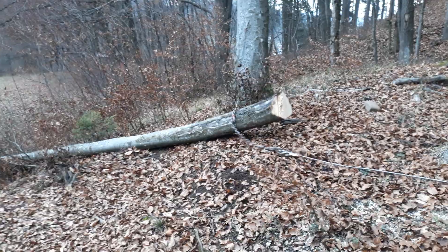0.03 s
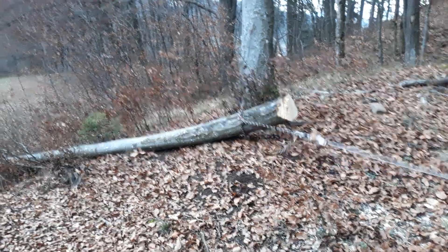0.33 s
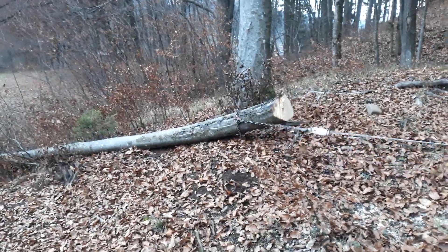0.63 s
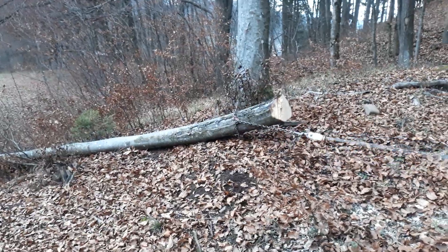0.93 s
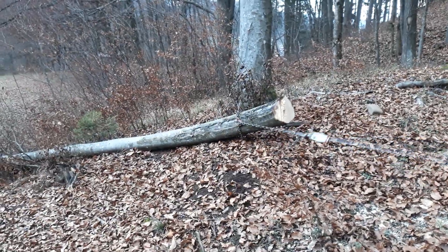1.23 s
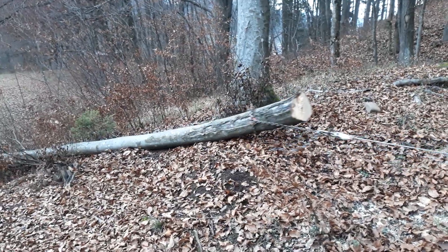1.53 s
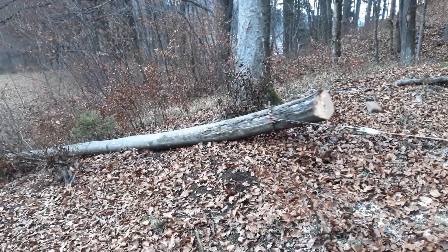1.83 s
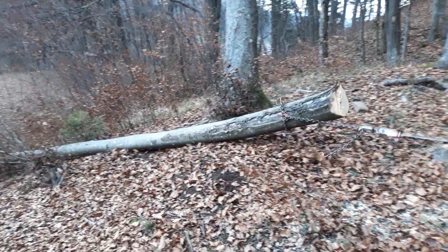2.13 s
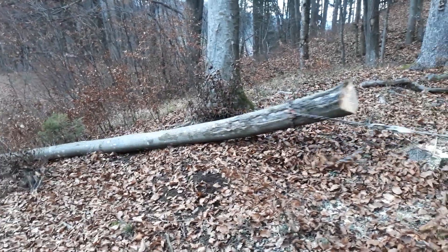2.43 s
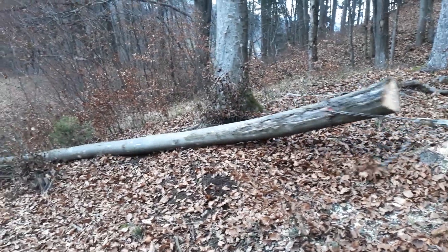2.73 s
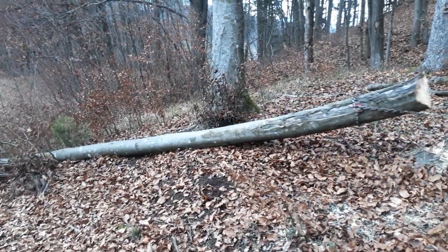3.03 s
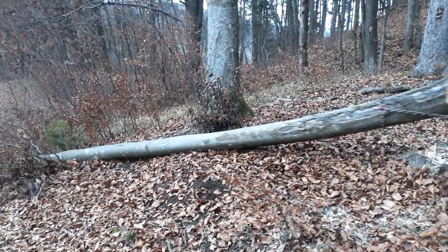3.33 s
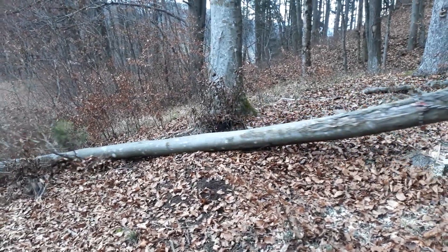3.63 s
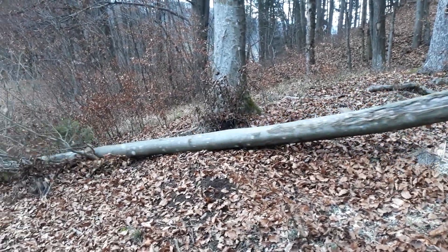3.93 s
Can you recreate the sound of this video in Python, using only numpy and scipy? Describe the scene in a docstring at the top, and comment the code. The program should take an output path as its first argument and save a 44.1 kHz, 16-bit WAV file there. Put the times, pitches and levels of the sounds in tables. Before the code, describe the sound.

Log crunching and scraping over dry leaves, with cracks and a low engine chug.

```python
"""A winch hauls a heavy log through dry leaves. First its engine chugs at a distance.
Then the cable swishes up out of the leaves and tightens, as a chain jingles and stalks crunch.
At about 1.3 s the log groans and breaks loose with a crack; the chain clinks and the engine sags.
The trunk slides on, crushing leaves, scraping its bark and bumping the soil.
Near the end, twigs snap loudly."""
import sys
import numpy as np
from scipy import signal
from scipy.fft import rfft, irfft
from scipy.io import wavfile
from scipy.ndimage import map_coordinates

SR = 44100
rng = np.random.default_rng(int(sys.argv[2]) if len(sys.argv) > 2 else 0)


def persist_wave(psi):
    """Save psi, clipped to +-1, as 16-bit WAV."""
    counts = np.round(np.clip(psi, -1, 1) * 32767).astype(np.int16)
    wavfile.write(sys.argv[1], SR, np.atleast_2d(counts).T)


N = 176400  # 4 seconds


def gain(db):
    """Turn decibels into a number to multiply by."""
    return 10 ** (np.asarray(db) / 20)


def unit(x):
    """Scale a signal to an average strength (rms) of 1."""
    return x / np.sqrt(np.mean(x ** 2) + 1e-18)


def clock():
    """The time of every sample, in seconds."""
    return np.arange(N) / SR


def curve(table, column=1):
    """Join a table's points with straight lines in time, holding the first and last values."""
    rows = np.array(table)
    return np.interp(clock(), rows[:, 0], rows[:, column])


def drift(turns_per_s):
    """A random wander, usually between -1 and 1."""
    points = rng.standard_normal(2048)
    return unit(map_coordinates(points, [clock() * turns_per_s], order=1, mode="wrap"))


def colour(x, points):
    """Make some frequencies stronger than others; beyond the points, lose 48 dB per octave."""
    hz, db = np.array(points).T
    size = 4096
    octave = np.log2(np.maximum(np.arange(size // 2 + 1) * SR / size, 1))
    knots = np.log2(hz)
    outside = np.abs(octave - np.clip(octave, knots[0], knots[-1]))
    shape_db = np.maximum(np.interp(octave, knots, db) - 48 * outside, -80)
    # build the filter so that it rings only after a click, never before
    cepstrum = irfft(np.log(gain(shape_db)))
    cepstrum[1:size // 2] *= 2
    cepstrum[size // 2 + 1:] = 0
    response = irfft(np.exp(rfft(cepstrum)))
    return signal.fftconvolve(x, response / np.linalg.norm(response))[:len(x)]


def ticks(per_s, spread_db):
    """Tiny clicks at random moments; the spread makes their sizes uneven."""
    happens = rng.random(N) < per_s / SR
    sizes = gain(spread_db * np.minimum(rng.standard_normal(N), 3))
    return unit(happens * sizes * rng.choice([-1, 1], N))


def fade(start, fade_s, hold_s=0):
    """Start suddenly, hold, then die away by 60 dB in fade_s seconds."""
    age = clock() - start
    return (age >= 0) * np.exp(-np.log(1000) * np.clip((age - hold_s) / fade_s, 0, 10))


def ringing(blows, tones):
    """A struck object rings: each tone builds up over two cycles and dies away."""
    age = clock()[:SR // 4]
    ring = 0
    for hz, db, fade_s in tones:
        loudness = gain(db) * np.minimum(age * hz / 2, 1) * np.exp(-np.log(1000) * age / fade_s)
        ring += loudness * np.sin(2 * np.pi * hz * age)
    return signal.fftconvolve(blows, ring)[:N]


def breaking(events, crackle, hold_s, fade_s, click_db):
    """Each event is one sharp break and a short, dying run of smaller ones."""
    breaks = crackle * sum(gain(db) * fade(start, fade_s, hold_s) for start, db in events)
    for start, db in events:
        breaks[int(start * SR)] += gain(db + click_db)
    return breaks


# how fast the engine fires (time [s], firing rate [Hz])
ENGINE_SPEED = [(0.08,36.3),(0.97,36.7),(1.23,36.0),(1.49,34.5),(1.85,35.4),(2.07,34.9),(2.31,35.3),(3.08,35.4),(3.39,34.6),(3.54,35.3),(4.0,35.0)]
# exhaust tones at 1, 2, 3... times the firing rate (relative level free [dB], when pulling [dB])
EXHAUST_TONES = [(-20,-21),(-4,1),(-1,1),(-2.5,-2.5),(1,1),(-43,-19),(-12,-11.5),(-16.5,-13.5),(-21,-31)]
# the colour of the engine and winch clatter (frequency [Hz], relative level [dB])
CLATTER_COLOUR = [(130,-12.5),(205,0),(250,-11),(600,-15),(785,-9.5),(880,-18),(1100,-12.5),(1880,-7),(2500,-23),(4300,-21),(5200,-16.5),(8000,-19.5),(10100,-39),(15000,-32)]
LOAD_START_S, LOAD_RISE_DB_PER_S = 1.305, 1.03  # the engine works harder as the log climbs
SILENCER_LAG_RAD = 0.297  # the silencer delays the higher tones, softening each beat

def engine():
    """Low exhaust beats swell as the winch takes the load; clatter throbs with each firing."""
    since_load = clock() - LOAD_START_S
    load = np.clip(since_load / 0.03, 0, 1)
    firing_hz = curve(ENGINE_SPEED) * (1 + 0.0073 * drift(40.3))  # firings come a bit early or late
    angle = 2 * np.pi * (np.cumsum(firing_hz) / SR + 0.286)
    exhaust = 0
    for k, (free_db, pulling_db) in enumerate(EXHAUST_TONES):
        tone = np.cos((k + 1) * angle - SILENCER_LAG_RAD * k ** 2)
        exhaust += gain(free_db + load * (pulling_db - free_db)) * tone
    exhaust_db = -37.5 + load * LOAD_RISE_DB_PER_S * since_load + 1.5 * drift(36)
    throb = 1 + 0.09 * np.cos(angle)
    clatter = colour(rng.standard_normal(N) * throb, CLATTER_COLOUR)
    return gain(exhaust_db) * unit(exhaust) + gain(-41.5) * clatter


# how strongly the cable stirs the leaves (time [s], level [dB])
CABLE_LEVEL = [(0.08,-47),(0.25,-41.5),(0.3,-45),(0.36,-33.5),(0.43,-31.5),(0.485,-39.5),(0.52,-34),(0.6,-38),(0.645,-44),(0.8,-45.5),(0.92,-51.5),(0.99,-42),(1.07,-52.5),(1.26,-45),(1.3,-42)]
# the colour of its swish (frequency [Hz], relative level [dB])
CABLE_COLOUR = [(790,-5.5),(1100,-9.5),(2110,-3),(2850,-6.5),(3130,-0.5),(3400,-1),(4700,-4.5),(5250,0.5),(6000,-6.5),(7800,-5),(10000,-15.5),(15500,-13)]

def cable():
    """The cable moves through leaves: a thick swish when it whips, thin crackles when it creeps."""
    level_db = curve(CABLE_LEVEL)
    ticks_per_s = 9000 * gain(level_db - level_db.max())
    rustle = ticks(ticks_per_s, spread_db=3.5)
    rustle /= np.sqrt(ticks_per_s / ticks_per_s.mean())  # more ticks alone do not make it louder
    return colour(rustle * gain(level_db + 0.5 + drift(69.2)), CABLE_COLOUR)


# links shifting in the chain round the log (time [s], level [dB])
CLINKS = [(1.3415,-25.5),(1.349,-33),(1.4712,-32),(1.486,-22.5),(1.589,-27),(1.6544,-25.5),(1.666,-26.5),(1.851,-29)]
# the tones of a link (frequency [Hz], relative level [dB], fade time [s])
LINK_TONES = [(1940,2,0.0069),(3124,-8.5,0.012),(5600,0,0.012),(5450,-13,0.022),(7220,-2,0.0085),(7930,2,0.0069)]

def chain():
    """The links jingle faintly along with the cable, and grind over each other in short clinks."""
    contacts = ticks(2600, spread_db=6.5)
    jingle = gain(curve(CABLE_LEVEL) - 8.5 + 3.5 * drift(45))
    clinks = sum(gain(db) * fade(start, fade_s=0.018, hold_s=0.005) for start, db in CLINKS)
    steady_strength = np.std(ringing(contacts, LINK_TONES))
    return ringing(contacts * (jingle + clinks), LINK_TONES) / steady_strength


# clumps of leaves and stalks giving way (time [s], level [dB])
CRUNCHES = [(0.4017,-28),(.455,-33),(0.7776,-37.5),(.822,-37),(1.1254,-29.5),(2.0343,-33),(2.7862,-26.5),(2.9714,-24),(3.1264,-28),(3.2337,-24),(3.339,-18)]
# the colour of a crunch (frequency [Hz], relative level [dB])
CRUNCH_COLOUR = [(1200,-16),(1900,6),(2700,-17),(3700,0),(5600,1),(7800,3.5),(10000,-13.5),(14000,-6.5)]

def crunches():
    """Leaves and stalks crunch in short, bright bursts of tiny breaks."""
    crackle = ticks(8000, spread_db=-1.0)
    breaks = breaking(CRUNCHES, crackle, hold_s=0.0033, fade_s=0.03, click_db=9)
    return colour(breaks, CRUNCH_COLOUR)


# twigs snapping (time [s], level [dB])
SNAPS = [(0.667,-21.5),(1.9553,-23.5),(3.7876,-9),(3.8027,-11.5),(3.812,-19),(3.8174,-13)]
# the colour of a snap (frequency [Hz], relative level [dB])
SNAP_COLOUR = [(350,-9),(750,-8.5),(1030,-13),(1330,1),(1520,-1),(1940,4.5),(2560,-14),(3450,-3.5),(4300,-11),(5350,-2.5),(7600,-8.5),(10100,-26),(14000,-19)]

def twigs():
    """Dry twigs snap with a hollow, woody crack."""
    crackle = ticks(18000, spread_db=-3.5)
    breaks = breaking(SNAPS, crackle, hold_s=0.0015, fade_s=0.015, click_db=12.5)
    return colour(breaks, SNAP_COLOUR)


# a short, low groan just before the crack, then dull bumps of the trunk
# (time [s], level [dB], starting pitch [Hz])
GROAN_AND_BUMPS = [(1.278,-35,354),(1.312,-27,340),(1.342,-26,174),(1.680,-29,480),(1.692,-29,259),(1.953,-35,657),(2.888,-28.5,283),(3.531,-31,187),(3.559,-34.5,413),(3.84,-32,264)]
PITCH_HALVES_S = 0.06

def groan_and_bumps():
    """The trunk groans, then bumps dully: three close tones sink in pitch as the soil gives way."""
    sound = np.zeros(N)
    for start, db, hz in GROAN_AND_BUMPS:
        age = np.maximum(clock() - start, 0)
        cycles = hz * PITCH_HALVES_S * np.log1p(age / PITCH_HALVES_S)
        ring = sum(np.sin(2 * np.pi * (cycles * ratio + rng.random())) for ratio in (0.75, 1, 1.3))
        rise = np.minimum(age / 0.003, 1)
        sound += gain(db) * rise * fade(start, fade_s=0.085) * ring
    return sound


# how loud the dragging is (time [s], leaf level [dB], bark level [dB])
DRAG_LEVELS = [(1.37,-36,-37),(1.55,-31.5,-34.5),(1.67,-31,-37.5),(1.82,-34.5,-39),(2.06,-30,-35.5),(2.24,-34.5,-40),(2.42,-29.5,-35),(2.75,-29.5,-37),(2.93,-26,-31),(3.1,-31.5,-37),(3.36,-27.5,-34),(3.6,-30,-35),(3.8,-26.5,-34),(4.0,-31.5,-37)]
# the colours of crushed leaves, scraping bark and shaken soil (frequency [Hz], relative level [dB])
LEAF_COLOUR = [(2600,-11.5),(3120,-2),(3620,0),(4340,-4),(5400,2.5),(6400,-1.5),(7350,0),(8400,-4.5),(9900,-16),(11800,-10.5),(12600,-14.5),(13900,-7.5),(15800,-16)]
BARK_COLOUR = [(400,-2),(680,-6),(785,-1.5),(860,-4.5),(1100,-11.5),(1340,-0.5),(1950,2.5),(2150,3.5),(2350,-8.5),(2700,-13.5)]
SOIL_COLOUR = [(110,-6),(200,1),(300,-5),(450,-12.5)]
SLIDE_START_S = 1.284

def sliding_log():
    """Leaves crackle, bark scrapes and the soil rumbles under the moving trunk."""
    moving = np.clip((clock() - SLIDE_START_S) / 0.03, 0, 1)
    catch_db = 0.88 * drift(60)  # leaves and bark flicker together
    leaves = moving * ticks(9000, spread_db=0.5) * gain(curve(DRAG_LEVELS) + catch_db)
    bark = moving * ticks(3500, spread_db=0.5) * gain(curve(DRAG_LEVELS, column=2) + catch_db)
    soil = moving * rng.standard_normal(N) * gain(-43.5 + 2.0 * drift(14))
    return colour(leaves, LEAF_COLOUR) + colour(bark, BARK_COLOUR) + colour(soil, SOIL_COLOUR)


# the jolts that free the log (time [s], relative level [dB])
JOLTS = [(1.309,-1),(1.322,-15),(1.3425,-24)]
# the tones of its wood (frequency [Hz], relative level [dB], fade time [s])
WOOD_TONES = [(775,-19,.06),(815,-22,.05),(1735,-7,.029),(1830,-7.5,.029)]
# the colour of splitting wood (frequency [Hz], relative level [dB])
SPLIT_COLOUR = [(1400,-24),(2000,-14),(2700,-10),(4700,-8),(6000,-2),(8300,1.5),(10000,-17),(13500,-10),(16000,-16)]

def log_breaks_loose():
    """With each jolt, fibres split and the wood rings."""
    blows = np.zeros(N)
    for start, db in JOLTS:
        blows[int(start * SR)] += gain(db)
    force = sum(gain(db) * fade(start, fade_s=0.021, hold_s=0.0016) for start, db in JOLTS)
    splitting = colour(ticks(20000, spread_db=3) * force, SPLIT_COLOUR)
    return ringing(blows, WOOD_TONES) + gain(-9) * splitting


def scene():
    """The engine, the nearby sounds and their faint echo off the trees, the same left and right."""
    distant = engine()
    near = cable() + chain() + crunches() + twigs()
    near += groan_and_bumps() + sliding_log() + log_breaks_loose()
    scatter = (rng.standard_normal(N) * fade(0.015, fade_s=0.14))[:SR]
    echo = signal.fftconvolve(near, scatter / np.linalg.norm(scatter))[:N]
    mono = distant + near + gain(-16.5) * echo
    return np.array([mono, mono])


SILENT_UNTIL_S, LOW_CUT_HZ, HIGH_CUT_HZ = 0.068, 35, 15750

def record(dry):
    """Start with an instant of silence, round off the peaks and cut the deepest bass and top treble."""
    rounded = np.tanh(dry) * (clock() >= SILENT_UNTIL_S)
    low_cut = signal.butter(3, LOW_CUT_HZ, "highpass", fs=SR, output="sos")
    high_cut = signal.ellip(10, 0.2, 70, HIGH_CUT_HZ, fs=SR, output="sos")
    return signal.sosfilt(high_cut, signal.sosfilt(low_cut, rounded))


dry = scene()
out = record(dry)
persist_wave(out)
```